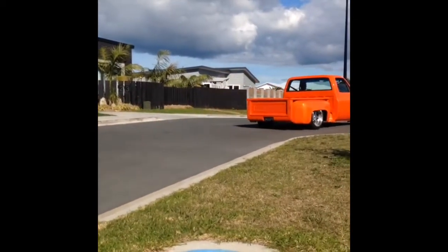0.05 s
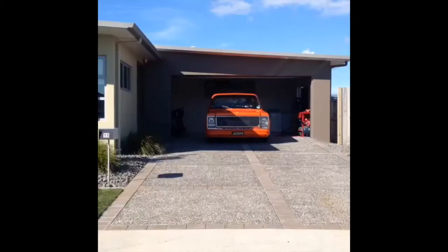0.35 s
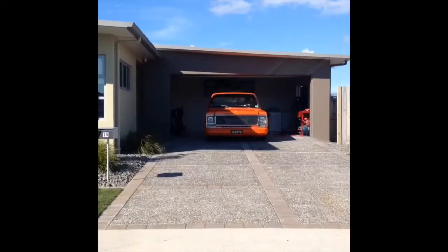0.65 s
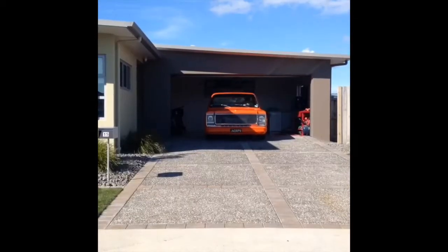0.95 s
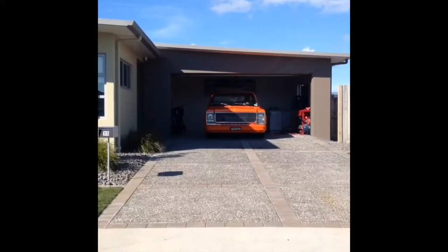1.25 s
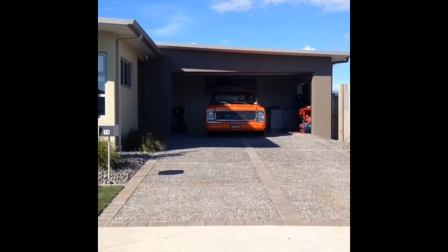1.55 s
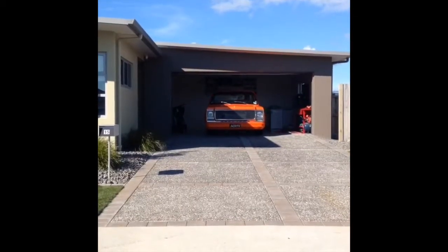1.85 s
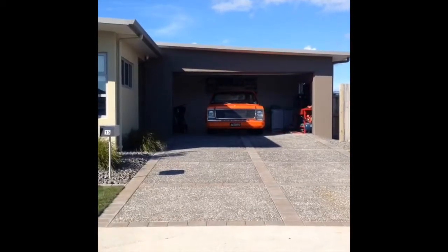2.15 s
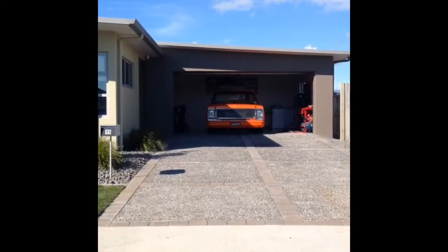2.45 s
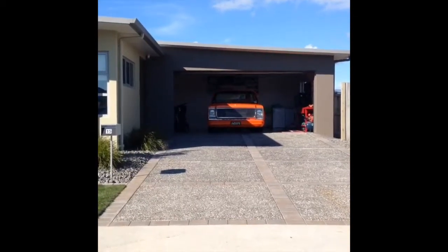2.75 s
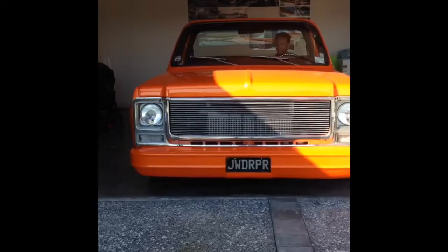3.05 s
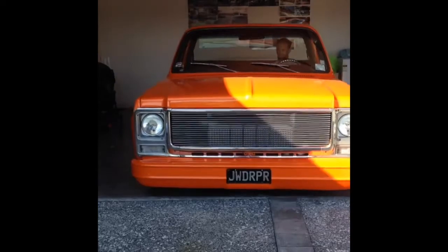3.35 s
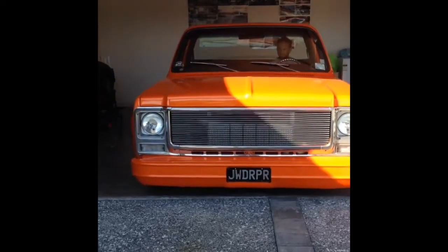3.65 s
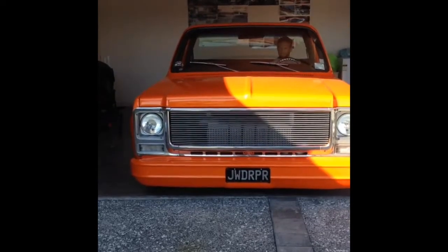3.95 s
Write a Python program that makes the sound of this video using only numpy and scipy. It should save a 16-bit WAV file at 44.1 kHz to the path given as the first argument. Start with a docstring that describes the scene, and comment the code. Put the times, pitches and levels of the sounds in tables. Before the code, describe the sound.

Lumpy truck idle in a garage, then a burst of air and a rattling thud.

```python
"""An open garage, heard from the driveway: a V8 pickup idles, its uneven firings driving a lumpy exhaust
under a whistling intake hiss, with soft bumps on the microphone and faint tones far off.
Then, close up and with the engine off, the suspension valves dump their air in a hissing jet;
the body drops on its stops, rattles and rebounds, and the garage rings."""
import sys
import numpy as np
from scipy import signal
from scipy.fft import rfft, irfft
from scipy.io import wavfile
from scipy.ndimage import uniform_filter1d

SR = 44100
rng = np.random.default_rng(int(sys.argv[2]) if len(sys.argv) > 2 else 0)


def wav_out(sig):
    """Save sig, one row per channel (or a flat mono array), as 16-bit PCM at SR to the path in sys.argv[1]."""
    wavfile.write(sys.argv[1], SR, np.round(np.clip(np.atleast_2d(sig).T, -1, 1) * 32767).astype(np.int16))


N = 176400
DRIVEWAY_S, CLOSE_UP_S = .084, 2.804  # the listening position changes


def undb(db):
    """Decibels to gain."""
    return 10 ** (np.asarray(db) / 20)


def unit(x):
    """Scale to rms 1."""
    return x / np.sqrt(np.mean(x ** 2))


def clock():
    """Time of each sample in s."""
    return np.arange(N) / SR


def curve(rows):
    """Join (t/s, value) rows by straight lines."""
    return np.interp(clock(), *np.array(rows).T)


def per_hz(rows, hz):
    """Read (f/Hz, value) rows on a log-frequency axis."""
    f, values = np.array(rows).T
    return np.interp(np.log(np.maximum(hz, 1)), np.log(f), values)


def colour(x, spectrum):
    """Minimum-phase EQ through (f/Hz, level/dB) points; rms 1."""
    cepstrum = irfft(np.log(undb(per_hz(spectrum, np.fft.rfftfreq(2 * N, 1 / SR)))))
    cepstrum[1:N] *= 2
    cepstrum[N + 1:] = 0
    return unit(irfft(rfft(x, 2 * N) * np.exp(rfft(cepstrum)))[:N])


def noise(spectrum):
    """Noise with the given spectrum; rms 1."""
    return colour(rng.standard_normal(N), spectrum)


def walk(rate_hz):
    """Random drift that takes a new course rate_hz times a second; rms 1."""
    step = int(SR / rate_hz)
    return unit(uniform_filter1d(np.repeat(rng.standard_normal(N // step + 1), step), step)[:N])


def resonances(rows, flutter_db=0):
    """Noise ringing in (f/Hz, width/Hz, level/dB) resonances that may flutter separately; rms 1."""
    f = np.fft.rfftfreq(N, 1 / SR) + 1
    out = 0
    for hz, width, db in rows:
        rejection = (1 + .5j * (f * f - hz * hz) / (f * width)) ** 2
        band = irfft(rfft(rng.standard_normal(N)) / rejection, N)
        out += band * undb(db + flutter_db * walk(25.13))
    return unit(out)


def envelope(start, attack, hold, release):
    """Linear attack, then an exponential release from `hold` after the start; all in s."""
    age = clock() - start
    return np.clip(age / attack, 0, 1) * np.exp(-np.maximum(age - hold, 0) / release)


def tones(rows, waver):
    """Short (t/s, length/s, f/Hz) tones that swell and fade; waver is the relative pitch spread."""
    t = clock()
    wavering = t + waver * np.cumsum(walk(90)) / SR
    return sum(np.sin(np.pi * np.clip((t - start) / length, 0, 1)) * np.sin(2 * np.pi * hz * wavering)
               for start, length, hz in rows)


def ring(modes, start, spread=0.0077):
    """Strike (f/Hz, level/dB, t60/s) modes, slightly detuned on every hit."""
    age = np.maximum(clock() - start, 0)
    detune = 1 + spread * rng.standard_normal(len(modes))
    out = 0
    for k, (hz, db, t60) in enumerate(modes):
        decay = np.exp(-np.log(1000) * age / t60)
        out += (-1) ** k * undb(db) * np.sin(2 * np.pi * hz * detune[k] * age) * decay
    return out


def garage(x, wet_db):
    """Add the diffuse ring of the garage, shortest in the top treble."""
    # reverb time: f/Hz, t60/s
    decay = [(100, 1), (500, 0.72), (2000, 1), (6000, 1), (14000, 0.56)]
    f, t, bands = signal.stft(rng.standard_normal(N), SR, nperseg=512)
    tail = signal.istft(bands * np.exp(-np.log(1000) * t / per_hz(decay, f)[:, None]), SR)[1][:N]
    tail *= np.clip(clock() / 0.029, 0, 1)  # the echoes build up
    return x + undb(wet_db) * signal.fftconvolve(x, tail / np.linalg.norm(tail))[:N]


def room_tone():
    """The quiet bed of noise with the engine off."""
    # spectrum: f/Hz, level/dB
    hush = [(40, 3), (600, 3.5), (800, -5), (2500, -4.5), (3200, 2), (15000, -14.5)]
    return undb(-59.5) * noise(hush)


def far_tones():
    """Faint wavering tones, far off."""
    # tones: t/s, length/s, f/Hz
    notes = [(.08, 0.22, 2240), (.26, 0.097, 1100), (.33, 0.13, 783), (.43, 0.072, 1034)]
    return undb(-52.5) * tones(notes, waver=.02)


def tick():
    """One dry tick as the driveway is first heard."""
    return undb(-32.5) * resonances([(745, 1600, 0)]) * envelope(DRIVEWAY_S, 0.00026, 0, 0.0018)


def bumps(width_cycles=0.39):
    """Short dull pressure swings on the microphone, each with a low rustle."""
    # soft bumps: t/s, level/dB, f/Hz
    knocks = [(0.753, -19.5, 218), (0.78, -24.5, 283), (.810, -25.5, 356), (1.984, -27, 330),
              (1.991, -8, 147), (1.999, -21.5, 340), (2.022, -26.5, 355), (2.384, -20, 290.4),
              (2.684, -23, 197.9), (2.695, -33, 395)]
    rustle = undb(-12.5) * resonances([(362, 124, 0)])
    out = 0
    for start, db, hz in knocks:
        cycles = (clock() - start) * hz
        swing = np.sin(2 * np.pi * cycles) * np.exp(-.5 * (cycles / width_cycles) ** 2)
        rub = envelope(start, 1 / hz, 0, 0.014) * min(hz / 400, 1) ** 2  # deeper bumps rustle less
        out += undb(db) * (swing + rustle * rub)
    return out


def engine_bay(firings):
    """The engine bay rustles, pulsing gently in step with the firings."""
    # spectrum: f/Hz, level/dB
    rustle = [(400, -2), (1050, -0.5), (1600, -6.5), (2500, -8.5), (5000, -18), (9000, -17), (13000, -30)]
    return noise(rustle) * undb(-50.5 + np.cos(2 * np.pi * firings) + walk(13.04))


def intake(whistle_follow=0.48):
    """Intake turbulence hisses and rings in whistles that follow part of its swell and catch in chirps."""
    # hiss spectrum: f/Hz, level/dB
    hiss = [(1000, -26.5), (2500, -0.5), (3000, -0.5), (3400, 5.5), (4200, -3), (5200, -12.5), (7000, -10),
            (10000, -17), (14000, -32)]
    # hiss fader: t/s, level/dB
    fader = [(.08, -55), (.22, -48.5), (.32, -52.5), (.41, -43.5), (.47, -55), (.85, -51), (.98, -44.5),
             (1.06, -52.5), (1.3, -54), (1.52, -49), (1.62, -50.5), (1.88, -46), (2.28, -55.5), (2.55, -56),
             (2.7, -46.5)]
    # whistling resonances: f/Hz, width/Hz, level/dB
    peaks = [(3375, 40, 4), (3587, 25, 0), (3170, 100, -4), (6440, 150, -8), (6710, 88, -7.5),
             (8340, 64, -12)]
    # where the whistle catches: t/s, length/s, f/Hz
    catches = [(.2, 0.054, 3380), (.37, 0.089, 3360), (.61, 0.052, 3320), (.79, 0.049, 3373),
               (1.08, 0.092, 3410), (1.32, 0.097, 3344), (1.46, .14, 3380), (1.77, .09, 3368),
               (1.85, 0.05, 3250), (1.9, 0.075, 3590), (2.07, 0.0624, 3460), (2.65, .08, 3355)]
    swell_db = curve(fader)
    chirps = undb(-43.5) * tones(catches, waver=0.00389)
    whistles = resonances(peaks, flutter_db=3) * undb(-49 + whistle_follow * (swell_db - swell_db.mean()))
    return (noise(hiss) * undb(swell_db) + chirps + whistles) * (clock() > DRIVEWAY_S)


def exhaust(firings, jitter_s=.0006, spread_db=2, gas_db=-5, boom_follow=0.11):
    """Uneven firings pulse through the exhaust over rushing gas; their third harmonic booms."""
    # each firing of the eight-cylinder cycle: level/dB
    cylinders = [4, 1, -0.5, -5.5, 1, 2, 3.5, -4]
    # exhaust spectrum: f/Hz, level/dB
    pipe = [(20, -66), (35, 2.5), (50, -0.5), (70, 8), (95, 6), (150, -0.5), (240, 0), (300, -14.5),
            (500, -48), (1000, -53), (9000, -120)]
    # rumble fader: t/s, level/dB
    fader = [(0, -34), (.32, -36), (.55, -36), (.78, -37), (.92, -41.5), (.97, -35), (1.5, -37),
             (2.05, -35.5), (2.35, -38), (2.8, -35)]
    # boom fader: t/s, level/dB
    boom_fader = [(0, -34), (.17, -49), (.26, -21.5), (.31, -60), (.41, -30), (.48, -41), (.59, -28),
                  (.67, -48), (.745, -30.5), (.9, -51.5), (1.27, -37), (1.5, -41), (1.62, -29.5),
                  (1.9, -48.5), (1.95, -25), (2.05, -35.5), (2.14, -24.5), (2.21, -47), (2.47, -30),
                  (2.53, -40.5), (2.8, -35)]
    onsets = np.flatnonzero(np.diff(np.floor(firings)))
    timing, strength = rng.standard_normal((len(onsets), 2)).T
    onsets = np.clip(onsets + (jitter_s * SR * timing).astype(int), 0, N - 1)
    pulses = np.zeros(N)
    pulses[onsets] = undb(np.resize(cylinders, len(onsets)) + spread_db * strength)
    chug = unit(garage(colour(pulses - pulses.mean(), pipe), wet_db=-9.5))
    rumble = chug + undb(gas_db) * noise(pipe)
    boom_db = curve(boom_fader)
    rumble *= undb(curve(fader) + boom_follow * (boom_db - boom_db.mean()))  # throbs with the boom
    boom = np.sqrt(2) * np.sin(2 * np.pi * 3 * firings + 1.07 * walk(40)) * undb(boom_db)
    return rumble + boom


def engine():
    """The idling V8: one wandering firing rate drives exhaust and engine bay, under the intake's hiss."""
    # firing rate: t/s, f/Hz
    idle = [(0, 43.7), (.1, 48.7), (.8, 51.6), (1.11, 47), (1.72, 46.4), (2.05, 47.2), (2.22, 46),
            (2.55, 53.2), (2.8, 44.6)]
    firings = np.cumsum(curve(idle)) / SR
    return exhaust(firings) + engine_bay(firings) + intake()


def air_dump(open_s=0.016, close_s=0.031, sag_db_per_s=13):
    """The valves open with a low puff; the jet sags as the bags empty and spits as the body rebounds."""
    # bursts of air: t/s, length/s, level/dB
    bursts = [(2.987, 0.41, -27), (3.41, 0.1, -45.5), (3.673, 0.039, -49), (3.739, .02, -62)]
    # jet spectrum: f/Hz, level/dB
    hiss = [(180, -24), (300, -11.5), (1490, -4.5), (1700, -12), (3380, -1), (8880, -2), (15000, -7)]
    # air line resonances: f/Hz, width/Hz, level/dB
    air_line = [(1507, 110, -4.5), (1925, 140, -8), (3800, 460, -9.5)]
    # puff spectrum: f/Hz, level/dB
    whoomph = [(30, -9.5), (160, 6.5), (260, 5), (400, -18), (750, -4.5), (1500, -42)]
    flow = 0
    for start, length, db in bursts:
        sag_db = sag_db_per_s * np.maximum(clock() - start, 0)
        flow += undb(db - sag_db) * envelope(start, open_s, length, close_s)
    jet = noise(hiss) + undb(-12) * resonances(air_line)
    puff = undb(-30.5) * noise(whoomph) * envelope(bursts[0][0], open_s, open_s, release=0.058)
    return garage(jet * flow, wet_db=-4) + puff


def body_drop(thud_t60_s=0.23, clatter_t60_s=0.32, clatter_rise_s=0.018):
    """Each blow thuds through the body, rings the panels and shakes loose metal; one bracket clanks."""
    # blows on the stops: t/s, thud level/dB, clatter level/dB
    blows = [(3.319, -15.5, -24.5), (3.348, -24, -27), (3.417, -23.5, -38.5), (3.447, -30, -55),
             (3.478, -32.5, -48), (3.567, -27.5, -38.5), (3.62, -35, -42.5), (3.69, -35.5, -35),
             (3.81, -40.5, -47.5)]
    # thud spectrum: f/Hz, level/dB
    body = [(30, -27), (65, -8), (95, 1), (225, 4), (310, -2), (430, -13.5), (650, -8), (3000, -41)]
    # clatter spectrum: f/Hz, level/dB
    loose_metal = [(200, 3.5), (500, 5), (800, 3), (1300, 2.5), (2600, -6.5), (3800, -4), (7000, -13.5),
                   (14000, -29)]
    # frame and panel modes: f/Hz, level/dB, t60/s
    panels = [(165.8, 3, 0.16), (237.7, 4.5, 0.2), (301.5, -2.5, 0.27), (510.6, -6.5, 0.29),
              (601, 1.5, .06), (718, -3, 0.12), (829, 0.5, 0.094), (1035, -12.5, 0.27), (1377, -11.5, 0.2)]
    # loose bracket modes: f/Hz, level/dB, t60/s
    bracket = [(1239, -0.5, 0.12), (1950, -3, 0.087)]
    thud = noise(body)
    clatter = noise(loose_metal) * unit(undb(2.64 * walk(250)))  # fast flicker adds grain
    out = undb(-21) * ring(bracket, start=3.371)
    for start, thud_db, clatter_db in blows:
        punch = envelope(start, attack=0.0015, hold=0.013, release=thud_t60_s / np.log(1000))
        shake = envelope(start, clatter_rise_s, clatter_rise_s, clatter_t60_s / np.log(1000))
        out += undb(thud_db) * (thud * punch + undb(-5) * ring(panels, start))
        out += undb(clatter_db) * clatter * shake
    return garage(out, wet_db=-7.5)


def scene():
    """The idle from the driveway, then a hard cut to the drop close up; the same in both ears."""
    close = np.clip((clock() - CLOSE_UP_S) / 0.00034, 0, 1)
    driveway = engine() + bumps() + tick() + far_tones()
    mono = (1 - close) * driveway + close * room_tone() + air_dump() + body_drop()
    return np.array([mono, mono])


def record(dry):
    """A steep high cut at 15.3 kHz."""
    return signal.sosfilt(signal.ellip(10, .2, 80, 15300, fs=SR, output="sos"), dry)


dry = scene()
out = record(dry)
wav_out(out)
```